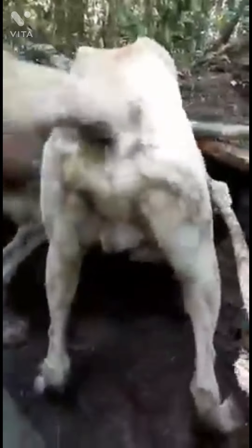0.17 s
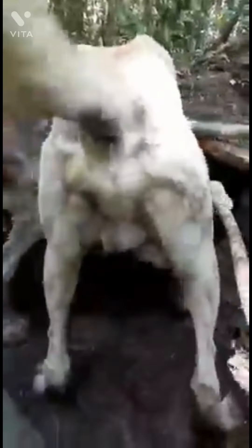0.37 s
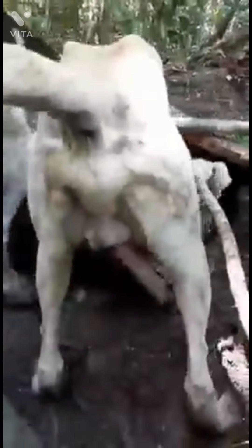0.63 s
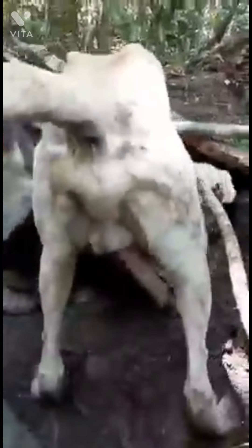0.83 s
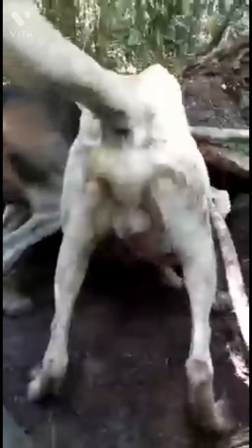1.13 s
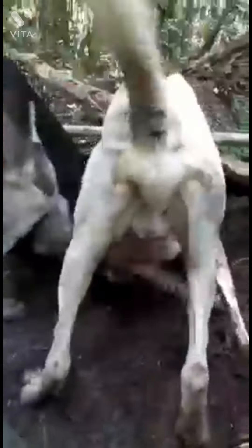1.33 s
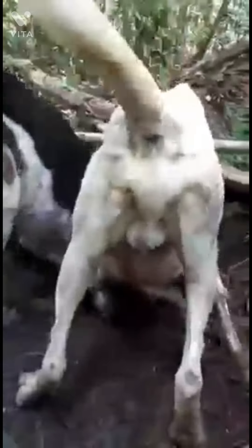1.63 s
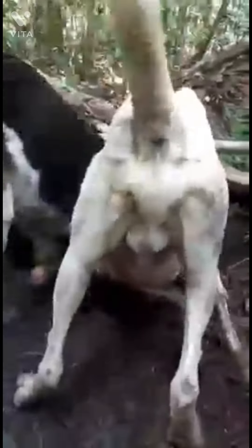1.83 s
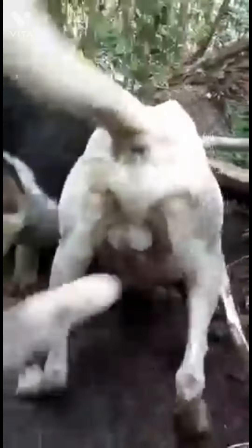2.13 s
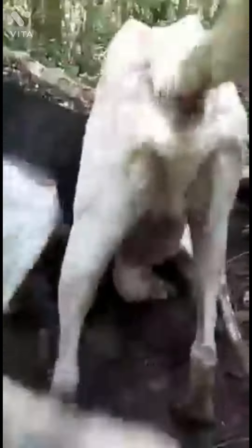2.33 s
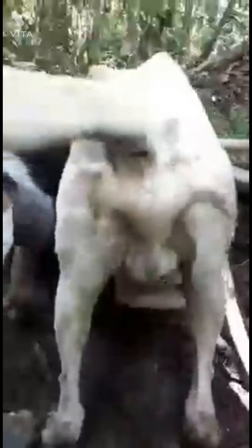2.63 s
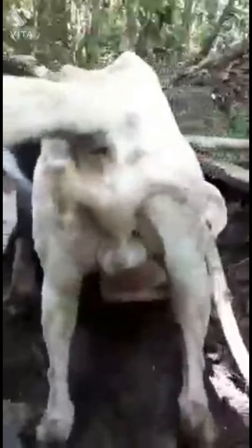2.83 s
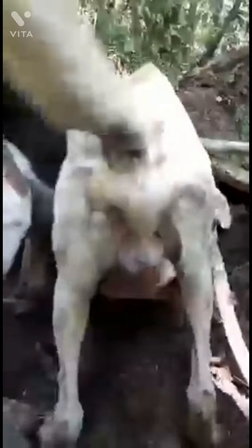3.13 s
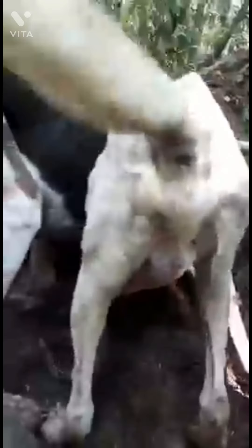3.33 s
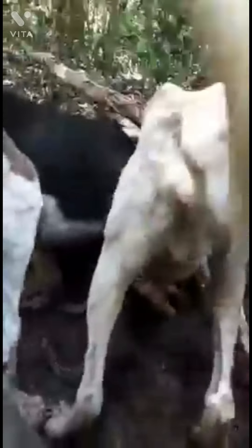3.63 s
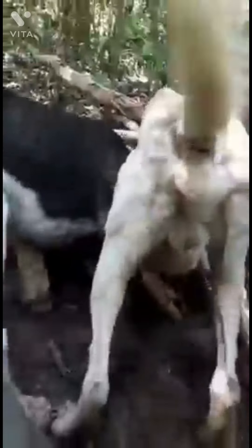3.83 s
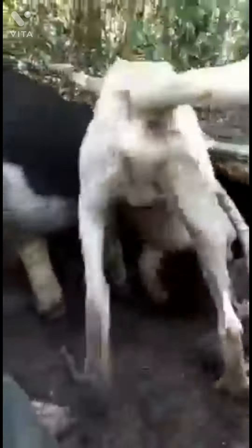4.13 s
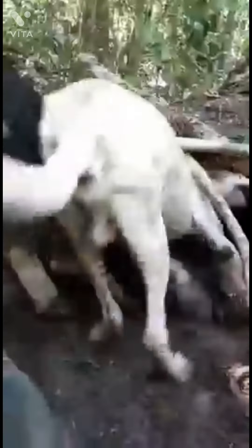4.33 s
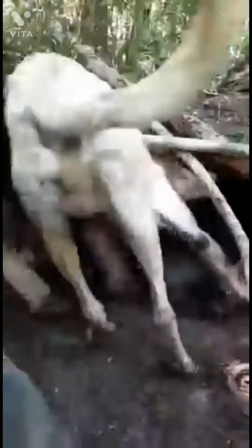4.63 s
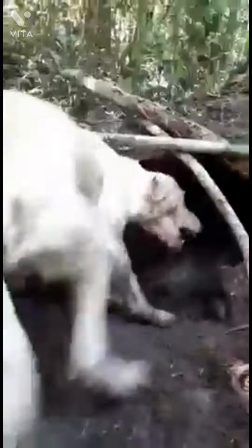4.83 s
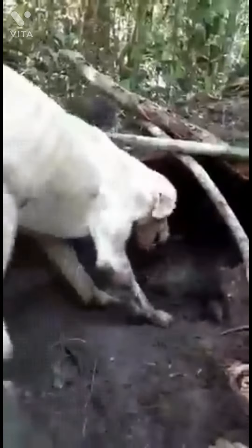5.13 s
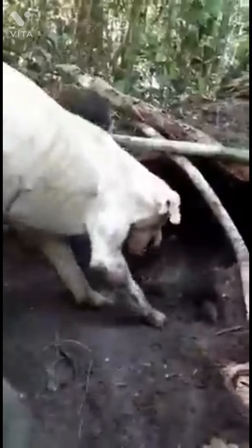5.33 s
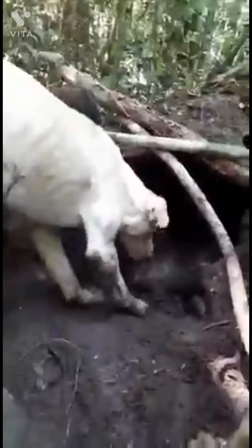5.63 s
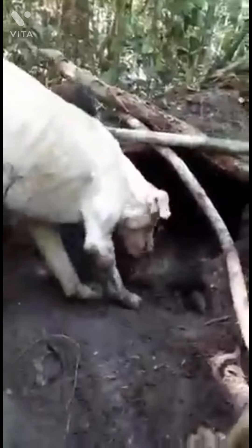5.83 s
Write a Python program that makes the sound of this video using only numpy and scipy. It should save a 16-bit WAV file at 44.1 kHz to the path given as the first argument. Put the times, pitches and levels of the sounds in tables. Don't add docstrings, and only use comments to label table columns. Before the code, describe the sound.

Outdoors in woodland, close and loud, a dog holds a clear, slightly rising bay for under a second until it breaks. Panting, snuffling and soft thuds of paws in dry soil follow. From two seconds, short high barks arch up and down in pitch, with raspy breaths between them and a low growl from the cornered animal. Near the end a duller second bay joins the barks.

```python
import sys
import numpy as np
from scipy import signal
from scipy.fft import rfft, irfft, next_fast_len
from scipy.io import wavfile
from scipy.ndimage import uniform_filter1d, minimum_filter1d, map_coordinates

SR = 44100
rng = np.random.default_rng(int(sys.argv[2]) if len(sys.argv) > 2 else 0)


def waveform_to_disk(signal):
    frames = np.transpose(np.atleast_2d(signal))
    scaled = np.clip(frames, -1, 1) * 32767
    samples = np.round(scaled).astype(np.int16)
    wavfile.write(sys.argv[1], SR, samples)


def volts_from_db(level):
    exponent = np.asarray(level, float) / 20
    return 10 ** exponent


N = 263718
T = np.arange(N) / SR

# (frequency [Hz], level [dB])
AIR = [(2000, -26), (3000, 0.5), (4500, -3.5), (6300, -3), (8000, -0.5), (10000, -13.5), (16000, -6)]
AIR_DB = -76
# (frequency [Hz], correlation [-1 to 1])
LIKENESS = [(60, 0.93), (150, 1), (390, 0.3), (1010, 0.72), (2600, 0.1)]
PORT_HZ = 2800

# (delay [s], level [dB])
ECHOES = [(.0027, -8), (.0046, -11), (.0095, -14), (.019, -20)]
TREES_T60_S, TREES_DB, TREES_CUT_HZ = 0.72, -34, 9000
NEAR_T60_S, NEAR_DB = .16, 14
CEILING, LIMIT_S = .92, .012

# (frequency [Hz], level [dB per Hz])
GROUND = [(30, -19), (70, -4.5), (115, 11), (235, 1.5), (330, -0.5), (500, -6), (800, -5), (1200, -7.5),
          (2000, -13), (2700, -20.5), (3300, -46), (6500, -28), (10000, -43.5), (16000, -52.5)]
# (time [s], level [dB])
SCUFFLE = [(0, -66), (.2, -70), (.75, -61.5), (.9, -58.5), (1.25, -65.5), (1.85, -74), (2.3, -47),
           (2.7, -62), (3.12, -67.5), (3.3, -77), (3.65, -66), (3.82, -84), (3.97, -88), (4.5, -50),
           (5.1, -64), (5.68, -58.5), (5.85, -69), (5.98, -56.5)]
# (middle [s], length [s], level [dB], brightness [dB])
PANTS = [(.01, 0.034, -43, -3.5), (0.327, 0.15, -44, -1.5), (0.803, 0.046, -46, 5.5),
         (1.07, 0.103, -74, -5), (1.297, 0.07, -60, -3), (1.192, 0.072, -57, 9), (1.427, 0.054, -52, -7),
         (1.639, .15, -61, 5), (1.92, 0.12, -57, 2), (2.005, 0.046, -35, 0), (2.279, 0.14, -33, -1.5),
         (2.802, .16, -50.5, -4), (2.951, 0.075, -56, 14.5), (3.035, 0.13, -58, 4),
         (3.409, 0.051, -43.5, -3), (3.65, 0.1, -47, -3.5), (4.257, 0.6, -44, -3), (4.55, 0.14, -45, -6),
         (4.682, 0.26, -53, 5), (4.841, 0.059, -30.5, -3.5), (5.694, 0.12, -54.5, -0.5)]
PANT_EDGE_DB = -9
RUMBLE_DB, PANT_DB, LEAVES_DB = 5, 17.5, 12.5
# (time [s], peak level [dB])
TWIGS = [
    (1.1292, -62),
    (1.5263, -55),
    (1.958, -46.5),
    (4.7727, -51.5),
]
# (time [s], peak level [dB], soil pitch [Hz], grit level [dB])
THUDS = [(0.938, -37, 110, -15), (1.057, -43.5, 226, -11), (1.13, -65, 345, 14), (1.415, -35, 229, -27),
         (1.629, -47, 104, -12), (1.758, -50, 329, -10), (1.959, -33, 171, -22), (2.561, -66, 330, 9),
         (3.391, -33.5, 329, -21), (4.759, -39, 340, -11), (5.678, -45, 180, 5)]

# (start [s], length [s], pulse rate [Hz], level [dB], mouth opening [dB])
GRUNTS = [
    (.04, .06, 106, -50, -4),
    (.28, .1, 135, -38, -8),
    (.75, .09, 130, -44, -3),
    (2.712, .19, 167, -34, 1),
    (4.625, .12, 128, -32, -16),
]
# (frequency [Hz], width [Hz], level [dB])
GRUNT_BODY = [(140, 110, 0), (335, 150, 3), (710, 220, -3), (1900, 260, -10), (2430, 240, -12)]
# (time [s], level [dB])
GRUNT_HEAVES = [(2.722, -6), (2.735, 3), (2.762, 5), (2.79, 3), (2.812, 1), (2.85, 1.5), (2.866, -7),
                (2.885, 3), (4.65, 2)]
HEAVE_S = .007
GRUNT_ATTACK_S, GRUNT_RELEASE_S, GRUNT_SAG_DB, GRUNT_SAG_SHARE = 0.0083, 0.033, -4, .06

# (start [s], length [s], level [dB], brightness [dB])
RASPS = [(1.992, .035, -34, 0), (2.2, .08, -32, -8), (2.272, .04, -27, 3), (2.43, .04, -31, 3),
         (2.915, .04, -43, 17), (2.97, .07, -55, 10), (3.398, .05, -33, 1), (3.56, .04, -30, 4),
         (4.13, .18, -30, -3), (4.32, .08, -24, 5), (4.45, .11, -31, 2), (4.835, .04, -28, 6),
         (5.44, .055, -28, 14), (5.6, .04, -36, 0)]
# (frequency [Hz], width [Hz], level [dB])
RASP_THROAT = [(390, 150, 0), (700, 140, -3), (1180, 200, -11), (1500, 200, -19), (2020, 220, -18),
               (2480, 220, -22), (3380, 300, -42)]
RASP_PULSES_PER_S, RASP_ATTACK_S, RASP_RELEASE_S = 420, .012, .03
# (frequency [Hz], level [dB per Hz])
HOARSE = [(150, -47.5), (300, -16.5), (620, 0), (1050, 2), (1400, -3.5), (2000, -9), (2600, -13),
          (3050, -41.5), (3400, -77.5)]
# (frequency [Hz], level [dB per Hz])
HISS = [(3000, -63.5), (3500, -8), (4300, -9.5), (5400, -3), (6600, 1.5), (8200, -5.5), (9500, -12.5),
        (12500, -6), (15700, -10)]
CLUMP_DB = 5.5

# (time [s], pitch [Hz], level [dB], mouth opening [dB])
BAYS = [
    [(0.0, 485.4, -24, 4.5), (.042, 520.8, -12.5, -4.5), (.114, 520.9, -12, -4.5),
     (.442, 552.6, -10.5, -10), (.61, 556.3, -9.5, -16.5), (.734, 547.3, -10, -16),
     (.76, 548.8, -11.5, -26), (.79, 531, -14.5, -6), (.812, 529, -40, -10.5)],
    [(5.0, 492.1, -31.5, 10.5), (5.03, 530.2, -17, 3), (5.128, 522.6, -15, -2), (5.172, 527, -16, -1),
     (5.406, 535, -17.5, -1), (5.49, 539.5, -20.5, 4), (5.57, 536.7, -21.5, -6.5)],
]
# (frequency [Hz], level [dB])
BAY_THROAT = [(1400, -2), (1620, 0), (2120, -10), (2400, -18), (2650, -36), (3100, -42), (3600, -60)]
# (frequency [Hz], level [dB])
BAY_TOP = [(3000, -26), (3700, -1), (4300, 7), (4800, -0.5), (5400, 2), (6500, 10), (8000, -11.5),
           (8800, -9.5), (10000, -35.5)]
# (left minus right [dB], left lead [samples])
BAY_SPOTS = [(-3.2, 6.5), (-3.2, 3.5)]
# (from [s], to [s], level [dB])
HALVED = [
    (0.79, 0.806, -31),
    (5.018, 5.149, -35),
]
CLOSING_DB = [32.5, 4]
CLOSING_S = 0.071
BAY_UPPER_DB, BAY_DULLS_DB_PER_S, BAY_TOP_DB, BAY_TOP_DB_PER_S = -17, -22.5, -37, -14.5
BAY_BREATH_HZ, BAY_BREATH_WIDTH_HZ, BAY_BREATH_DB = 915, 130, -35

# (start [s], crest [s], end [s], crest pitch [Hz], level [dB])
BARKS = [(2.003, 2.115, 2.188, 595, -11.5), (2.278, 2.392, 2.445, 495, -13), (3.418, 3.55, 3.595, 550, -14),
         (3.988, 4.087, 4.125, 622, -16.5), (4.315, 4.439, 4.488, 562, -13.5),
         (4.842, 4.97, 4.99, 545, -14.5), (5.435, 5.565, 5.62, 545, -19), (5.93, 6.0, 6.05, 580, -20),
         (4.925, 4.935, 5.01, 622, -12), (2.19, 2.2, 2.27, 400, -41), (4.12, 4.13, 4.19, 375, -31),
         (4.49, 4.5, 4.54, 330, -33), (.79, .792, .83, 440, -29.5)]
# (slack pitch at start [Hz], slack pitch at end [Hz], roundness of the arc [1 straight, 2
# round], mouth opening [dB], level at the start against the crest [dB])
BARK_VOICES = [(291, 350, 1.1, -5.5, -3), (306, 310, 1.4, -6, 1), (281, 350, 1.9, 5, 1.5),
               (290, 370, 0.96, 0.5, -2), (295, 330, .9, 6.5, -12), (290, 490, 1.7, 5, 1),
               (248.8, 300, 2.4, 5.5, 1), (271, 300, 1.4, 3.5, 1), (586, 400, 1.6, -10, -1),
               (351, 350, 1, -11, -1), (377, 345, 0.74, 0, -3.5), (340, 320, 0.99, 7.5, -1.5),
               (394, 300, 1.1, -8.5, -3)]
# (attack [s], loss over the fall [dB], upper partials [dB], top hiss [dB],
# change of mouth opening over the fall [dB])
BARK_EFFORT = [(0.033, -3, 1, -2, -4), (0.04, -1.5, -0.5, -2, 13), (0.02, -6, -5.5, -6, -16.5),
               (0.018, -1.5, -0.5, -6, -14), (0.028, -5, 2, -1, 1), (0.02, -8.5, 0, -2.5, -2),
               (0.024, -4.5, 4, 2, -12.5), (.03, -1, -2, -1, -1), (0.01, -12, -7, -8, 1.5),
               (0.014, 1, -10.5, -2.5, -2.5), (0.012, -9, -9, 0.5, 2.5), (0.018, -7, -9.5, 2.5, 4),
               (0.009, -3, -1.5, -1.5, 6)]
HOARSE_DB = [-16, -18, -16, -14, -5, -9, -8, -8, -20, 10, 13, 10, -14]
# (left minus right [dB], left lead [samples])
BARK_SPOTS = [(-2, 3.5), (-4, 5.5), (-4, -4.5), (-4, 3.5), (-3.5, 9.5), (-1.5, 6), (-7.5, 5), (-7, 6.5),
              (0.5, 6), (-5, 13.5), (-6, 3.), (-4, 12), (-3.5, 6)]
# (low [Hz], middle [Hz], high [Hz], lift [dB])
BARK_HOLLOWS = [(850, 1400, 2050, 8), (690, 1150, 1900, 8), (760, 1300, 1900, 7), (830, 1300, 2120, 10),
                (700, 1500, 1900, 8), (720, 1330, 1900, 7), (760, 1260, 2000, 11), (700, 1000, 1850, 6),
                (620, 1200, 1800, 1), (400, 700, 1200, 1), (390, 690, 1180, 1), (330, 690, 1400, 1),
                (440, 900, 1500, 1)]
HOLLOW_WIDTH_HZ = 120
# (frequency [Hz], level [dB])
BARK_THROAT = [(600, 4), (1070, 8.5), (1450, 1), (1950, 0.5), (2450, -11), (2900, -40), (3600, -88.5)]
# (frequency [Hz], level [dB])
CHEST = [(250, -3.5), (340, -6), (430, -1), (490, -2.5), (545, -10), (620, 3)]
# (frequency [Hz], level [dB])
MOUTH = [(500, -3.5), (680, -4), (800, -2), (950, 1), (1080, 1), (1250, -2.5)]
UPPER_DB, UPPER_DB_PER_OCT, UPPER_FALL_DB = -4, -4, -13
TOP_DB, TOP_DB_PER_OCT = -33.5, 9
BARK_RELEASE_S, SILENT_DB = 0.026, -28.5
FALL_SHARPNESS = .85
THROAT_SHIFT_DB = 1.3


def rms_one(x):
    return x / np.sqrt(np.mean(x ** 2) + 1e-20)


def at_hz(points, hz):
    point_hz, value = np.array(points).T
    return np.interp(np.log(hz), np.log(point_hz), value)


def band_filter(x, low_hz, high_hz, kind="band"):
    return signal.sosfilt(signal.butter(2, [low_hz, high_hz], kind, fs=SR, output="sos"), x)


def drift(rate, size=N):
    knots = rng.standard_normal(int(N / SR * 400))
    steps = np.arange(0, size + 16, 16)
    curve = map_coordinates(knots, [steps * rate / SR], order=3, mode="wrap")
    return np.interp(np.arange(size), steps, curve)


def coloured(x, spectrum):
    hz = np.maximum(np.arange(N // 2 + 1) * SR / N, 1)
    return rms_one(irfft(rfft(x) * volts_from_db(at_hz(spectrum, hz)), N))


def resonance(x, hz, width_hz):
    r = np.exp(-np.pi * width_hz / SR)
    poles = [1, -2 * r * np.cos(2 * np.pi * hz / SR), r * r]
    return signal.lfilter(np.array([1, 0, -1]) * (1 - r * r) / 2, poles, x)


def cavity(x, hz, width_hz):
    return resonance(resonance(x, hz, width_hz), hz, width_hz)


def columns(rows, ease_s=0.004):
    s, *controls = np.transpose(rows)
    span = slice(int(s[0] * SR), min(int(s[-1] * SR), N))
    t = T[span]
    fade = np.clip(np.minimum(t - s[0], s[-1] - t) / 0.0034, 0, 1)
    ease = int(ease_s * SR)
    return span, fade, [uniform_filter1d(np.interp(t, s, c), ease, mode="nearest") for c in controls]


def envelope_db(t, start, end, attack_s, release_s):
    attack = np.clip(1 - (t - start) / attack_s, 0, 1) ** 2
    release = np.clip((t - end) / release_s, 0, 1)
    return SILENT_DB * (attack + release)


def placed(x, balance_db, lead):
    heard, out = np.flatnonzero(x), np.zeros((2, N))
    span = slice(max(heard[0] - 64, 0), min(heard[-1] + 64, N))
    length = span.stop - span.start
    size = next_fast_len(length + 512)
    hz = np.arange(size // 2 + 1) * SR / size
    difference = np.log(volts_from_db(balance_db)) + 2j * np.pi * hz * lead / SR
    half = difference / (2 + 2 * (hz / PORT_HZ) ** 4)
    out[:, span] = irfft(rfft(x[span], size) * np.exp([half, -half]), size)[:, :length]
    return out


def bed(spectrum, level_db, patchy_db, grain_db):
    out, together, edges = 0, drift(9.), np.geomspace(30, 16500, 19)
    white = rng.standard_normal((2, 2, N)) * volts_from_db(grain_db * drift(210.0))
    for k, (low, high) in enumerate(zip(edges, edges[1:])):
        hz = np.sqrt(low * high)
        if spectrum[0][0] < hz < spectrum[-1][0]:
            mid, side = band_filter(white[k % 2], low, high)
            alike = np.clip(at_hz(LIKENESS, hz), -1, 1)
            flicker_db = patchy_db * (0.8 * together + drift(22.))
            gain = volts_from_db(at_hz(spectrum, hz) + level_db(hz) + flicker_db)
            out = out + gain * (np.sqrt(1 + alike) * mid + np.sqrt(1 - alike) * side * [[1], [-1]])
    return out


def forest_air():
    return bed(AIR, lambda hz: AIR_DB + 6, patchy_db=1.5, grain_db=.7)


def trees(x):
    t = T[:SR // 2]
    decay = volts_from_db(-60 * t / TREES_T60_S) + volts_from_db(NEAR_DB - 60 * t / NEAR_T60_S)
    tail = rng.standard_normal((2, len(t))) * decay * np.clip(t / 0.0037, 0, 1)
    tail = signal.sosfilt(signal.butter(2, TREES_CUT_HZ, fs=SR, output="sos"), tail)
    return signal.fftconvolve(x, tail / np.sqrt(np.sum(tail[0] ** 2)), axes=1)[:, :N]


def echoes(x):
    out = x.copy()
    for k, (s, db) in enumerate(ECHOES):
        for side in range(2):
            lag = int(s * (1 + 0.089 * side) * SR)
            out[side, lag:] += (-1) ** k * volts_from_db(db) * x[side, :-lag]
    return out


def ground_db(hz):
    if hz < 260:
        offset_db, tilt = RUMBLE_DB, -1
    elif hz < 1150:
        offset_db, tilt = PANT_DB, 0
    else:
        offset_db, tilt = LEAVES_DB, 1
    t = T[::64]
    power = volts_from_db(2 * np.interp(t, *np.transpose(SCUFFLE)))
    for s, length, db, bright_db in PANTS:
        sunk_db = PANT_EDGE_DB * np.minimum(2 * (t - s) / length, 4) ** 2
        power = power + volts_from_db(2 * (db + tilt * bright_db + sunk_db))
    return np.interp(T, t, 10 * np.log10(power)) + offset_db


def ground_noise():
    ground = bed(GROUND, ground_db, patchy_db=5.0, grain_db=3.0) * volts_from_db([[-1.5], [1.5]])
    return band_filter(ground, 2950, 4600, "bandstop")


def twigs():
    out, t = np.zeros(N), T[:int(.01 * SR)]
    for s, db in TWIGS:
        bright = np.diff(rng.standard_normal(len(t) + 2), 2) / 2
        i = int(s * SR)
        out[i:i + len(t)] += volts_from_db(db - 4.0) * bright * np.exp(-t / .001)
    return out


def thuds():
    out, t = np.zeros(N), T[:int(.12 * SR)]
    for s, db, hz, grit_db in THUDS:
        grit = rms_one(cavity(rng.standard_normal(len(t)), 990, 820))
        grit = grit * np.exp(-t / .012) * np.clip(t / .003, 0, 1)
        push = np.sin(2 * np.pi * hz * t) * (t / .005) * np.exp(1 - t / .005)
        i = int(s * SR)
        out[i:i + len(t)] += volts_from_db(db) * (push + volts_from_db(grit_db) * grit)
    return out


def grunt(start, length, rate_hz, db, open_db):
    t = np.arange(start, start + length + GRUNT_RELEASE_S, .003)
    gone = (t - start) / length
    shape_db = envelope_db(t, start, start + length, GRUNT_ATTACK_S, GRUNT_RELEASE_S)
    db = db + GRUNT_SAG_DB * gone + shape_db
    return np.transpose([t, rate_hz * (1 - GRUNT_SAG_SHARE * gone), db, open_db + 0 * t])


def grunts():
    chest, mouth = np.zeros((2, N))
    heave_db = sum(db * np.exp(-((T - s) / HEAVE_S) ** 2) for s, db in GRUNT_HEAVES)
    for row in GRUNTS:
        span, fade, (rate_hz, db, open_db) = columns(grunt(*row))
        size, heave = len(db), heave_db[span]
        uneven = 1 + .13 * volts_from_db(open_db) * drift(110., size)
        cycles = np.cumsum(rate_hz * uneven) / SR
        puff = np.diff(np.floor(cycles), prepend=0) + .012 * rng.standard_normal(size)
        chest_db = db + 42.5 + heave + 2.5 * drift(130., size) + drift(35., size)
        chest[span] = puff * fade * volts_from_db(chest_db)
        air = 3 * uniform_filter1d(np.abs(chest[span]), 400) * rng.standard_normal(size)
        mouth[span] = (chest[span] + air) * volts_from_db(open_db - 3 + heave / 2 + 2.5 * drift(90., size))
    rings = 0
    for k, (hz, width_hz, db) in enumerate(GRUNT_BODY):
        rings = rings + (-1) ** k * volts_from_db(db) * cavity(mouth if k > 1 else chest, hz, width_hz)
    return signal.sosfilt(signal.butter(6, 2600, fs=SR, output="sos"), rings)


def rasps():
    flap_gain = volts_from_db(2.5 * np.minimum(rng.exponential(1, N), 4))
    flaps = (rng.random(N) < RASP_PULSES_PER_S / SR) * flap_gain + .06 * rng.standard_normal(N)
    level, bright = np.zeros((2, N))
    for start, length, db, bright_db in RASPS:
        end = start + length
        span = slice(int(start * SR), int((end + RASP_RELEASE_S) * SR))
        gain = volts_from_db(db + envelope_db(T[span], start, end, RASP_ATTACK_S, RASP_RELEASE_S))
        level[span] += gain
        bright[span] += gain * volts_from_db(bright_db)
    rings = 0
    for k, (hz, width_hz, db) in enumerate(RASP_THROAT):
        ring = rms_one(cavity(flaps, hz, width_hz)) * volts_from_db(db + 2.5 * drift(40.))
        rings = rings + ring * (bright if k > 2 else level)
    return rings / np.sqrt(2)


def clumped(x):
    out, edges = 0, np.geomspace(140, 16000, 17)
    for k, (low, high) in enumerate(zip(edges, edges[1:])):
        out = out + (-1) ** k * band_filter(x, low, high) * volts_from_db(CLUMP_DB * drift(22.))
    return rms_one(out)


def breath_noise(colour):
    return coloured(clumped(rng.standard_normal(N)), colour) * volts_from_db(drift(60.))


def dog(rows, throat, top_colour, breath, hoarse_db, lines, jitter, shimmer_db, hollow=(1, 1, 1, 0)):
    span, fade, (hz, first_db, second_db, upper_db, top_db, *half_db) = columns(rows, ease_s=.006)
    size = len(hz)
    hz = uniform_filter1d(hz, SR // 180, mode="nearest") * (1 + .0025 * drift(13., size))
    phase = 2 * np.pi * np.cumsum(hz * (1 + jitter * drift(90., size))) / SR

    orders = np.arange(3, 19)[:, None]
    upper, top = volts_from_db(at_hz(throat, orders * hz)), volts_from_db(at_hz(top_colour, orders * hz))
    upper = upper / np.sqrt(np.sum(upper ** 2, axis=0)) * volts_from_db(upper_db)
    top = top / np.sqrt(np.sum(top ** 2, axis=0)) * volts_from_db(top_db) * np.sqrt(lines)

    *hollow_hz, lift_db = hollow
    gains, tone = [], 0
    for k, gain in enumerate([volts_from_db(first_db), volts_from_db(second_db), *(upper + top)], 1):
        nearness = sum(np.exp(-((k * hz - f) / HOLLOW_WIDTH_HZ) ** 2) for f in hollow_hz)
        gain = gain * volts_from_db(lift_db * (nearness - .4))
        gains.append(gain)
        wobble = volts_from_db(shimmer_db * np.sqrt(k) * drift(35., size))
        tone = tone + gain * wobble * np.sin(k * phase + k * k)
    if half_db:
        halves = [(.5, -20), (1.5, 0), (2.5, -3), (3.5, -7), (4.5, -15)]   # (order, dB)
        tone += volts_from_db(half_db[0]) * sum(volts_from_db(db) * np.sin(k * phase) for k, db in halves)

    slack_db = -17 * np.log2(hz / 500)
    loudness = np.sqrt(sum(g ** 2 for g in gains))
    rasp = loudness * volts_from_db(min(hoarse_db + 1, -21) + slack_db) * breath[0, span]
    hiss = volts_from_db(top_db) * np.sqrt(1 - lines) * breath[1, span]
    out = np.zeros(N)
    out[span] = fade * (np.sqrt(2) * tone + (1 + .5 * np.sin(phase)) * (rasp + hiss))
    return out


def bay(rows, halved, closing_db):
    s, *controls = np.transpose(rows)
    t = np.arange(s[0], s[-1], .003)
    hz, db, open_db = (np.interp(t, s, c) for c in controls)
    flare_db = closing_db * np.clip((t - s[-1] + CLOSING_S) / .015, 0, 1)
    upper_db = db + open_db + BAY_UPPER_DB + BAY_DULLS_DB_PER_S * (t - s[0]) + flare_db
    top_db = db + BAY_TOP_DB + BAY_TOP_DB_PER_S * (t - s[0])
    half_db = halved[2] + envelope_db(t, halved[0], halved[1], 0.025, .02)
    return np.transpose([t, hz, db, db + open_db, upper_db, top_db, half_db])


def baying(breath):
    bays = 0
    for rows, halved, closing_db, spot in zip(BAYS, HALVED, CLOSING_DB, BAY_SPOTS):
        calls = bay(rows, halved, closing_db)
        voice = dog(calls, BAY_THROAT, BAY_TOP, breath, -40., lines=.5, jitter=.003, shimmer_db=.9)
        bays = bays + placed(voice, *spot)
    rush = rms_one(cavity(breath[0], BAY_BREATH_HZ, BAY_BREATH_WIDTH_HZ))
    rush_db = BAY_BREATH_DB - 7 * (T > BAYS[1][0][0])
    return bays + volts_from_db(rush_db) * rush * uniform_filter1d(np.abs(bays), SR // 100)


def bark(call, voice, effort):
    start, crest, end, crest_hz, db = call
    from_hz, to_hz, roundness, open_db, start_db = voice
    attack_s, fall_db, upper_db, top_db, closing_db = effort
    t = np.arange(start, end + BARK_RELEASE_S, .003)
    rise = np.clip((crest - t) / max(crest - start, 1e-3), 0, 1)
    fall = np.clip((t - crest) / (end - crest), 0, 1)
    hz = crest_hz - (crest_hz - from_hz) * rise ** roundness
    hz = hz - (crest_hz - to_hz) * fall ** (FALL_SHARPNESS * roundness)
    octave = np.log2(hz / 500)

    db = db + start_db * rise + fall_db * fall + envelope_db(t, start, end, attack_s, BARK_RELEASE_S)
    at = ((t - start) * SR).astype(int)
    shift = [THROAT_SHIFT_DB * drift(28., int(.3 * SR))[at] for _ in range(4)]
    open_db = open_db + closing_db * np.sqrt(fall)
    first_db = db - open_db / 2 + at_hz(CHEST, hz) + shift[0] / 2
    second_db = db + open_db / 2 + at_hz(MOUTH, 2 * hz) + shift[1] / 2
    upper_db = upper_db + UPPER_DB + UPPER_DB_PER_OCT * octave + UPPER_FALL_DB * fall ** 2
    upper_db = db + open_db / 2 + upper_db + shift[2]
    top_db = db + top_db + TOP_DB + TOP_DB_PER_OCT * octave + shift[3]
    return np.transpose([t, hz, first_db, second_db, upper_db, top_db])


def barking(breath):
    barks = []
    each = zip(BARKS, BARK_VOICES, BARK_EFFORT, HOARSE_DB, BARK_SPOTS, BARK_HOLLOWS)
    for call, voice, effort, rough_db, spot, hollow in each:
        jitter, shimmer_db = .009 * volts_from_db(rough_db / 3 + 6), 2.3 + rough_db / 14
        rows = bark(call, voice, effort)
        sound = dog(rows, BARK_THROAT, HISS, breath, rough_db, .03, jitter, shimmer_db, hollow)
        barks.append(placed(sound, *spot))
    return barks


def pack():
    breath = np.array([breath_noise(colour) for colour in (HOARSE, HISS)])
    *barks, bay_break = barking(breath)
    return sum(barks) + placed(rasps(), -4.0, 6.0), baying(breath) + bay_break


def scene():
    air, ground = forest_air(), ground_noise()
    low = placed(grunts(), -1.5, 12.0) + placed(thuds() + twigs(), -1.2, 13.0)
    barks, bays = pack()
    ground /= 1 + uniform_filter1d(np.abs(barks[0]), SR // 50) / .04
    voices = volts_from_db(-1.22) * echoes(barks) + bays + volts_from_db(TREES_DB) * trees(barks + bays)
    return voices + low + ground + air


def low_pass(x):
    return signal.sosfilt(signal.butter(12, 15780, fs=SR, output="sos"), x)


def record(dry):
    span = int(LIMIT_S * SR)
    room = minimum_filter1d(np.minimum(1, CEILING / (np.abs(dry).max(axis=0) + 1e-9)), span)
    held = dry * uniform_filter1d(room, span)
    soft = 2.2 * np.tanh(held / 2.2)
    thin = signal.sosfilt(signal.butter(2, 70, "high", fs=SR, output="sos"), soft)
    return low_pass(thin)


dry = scene()
out = record(dry)
waveform_to_disk(out)
```